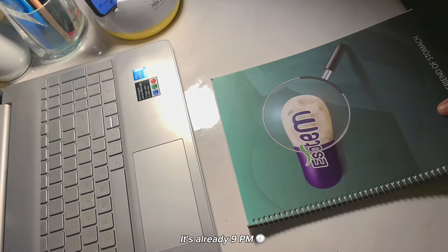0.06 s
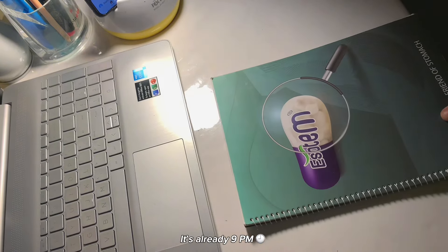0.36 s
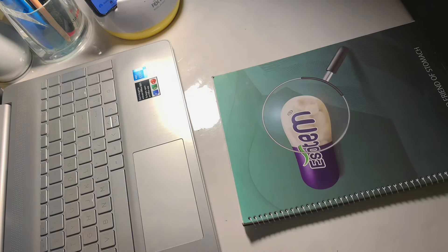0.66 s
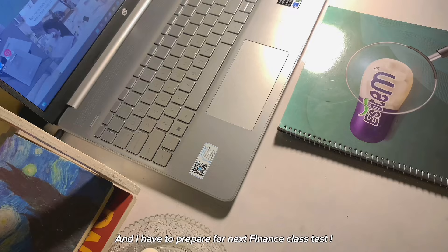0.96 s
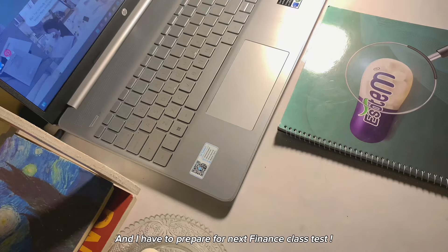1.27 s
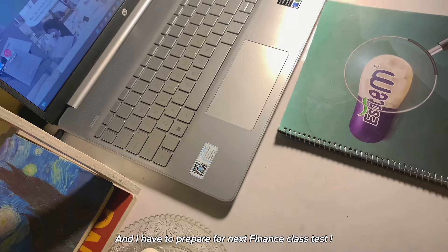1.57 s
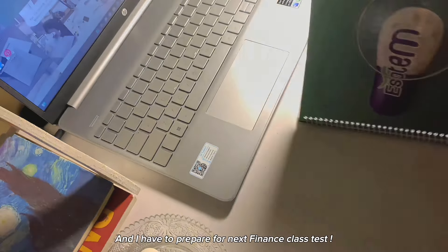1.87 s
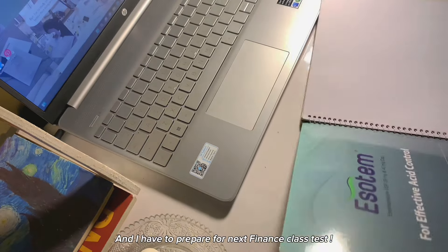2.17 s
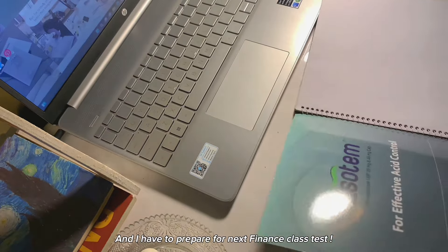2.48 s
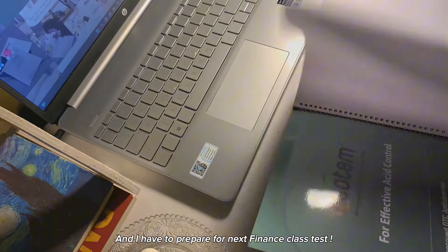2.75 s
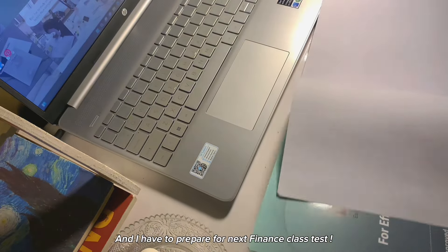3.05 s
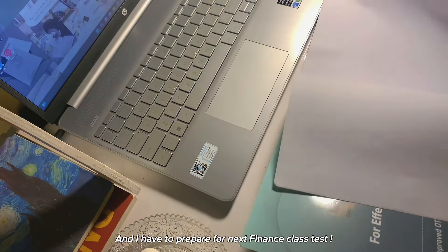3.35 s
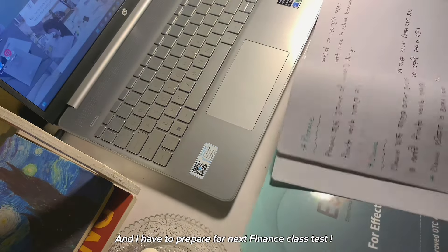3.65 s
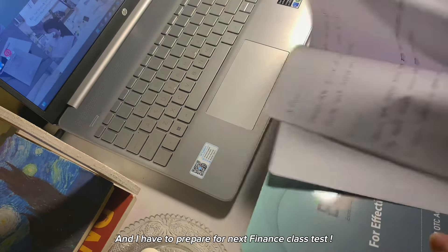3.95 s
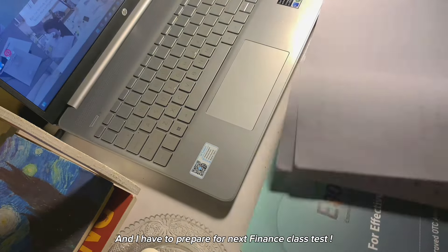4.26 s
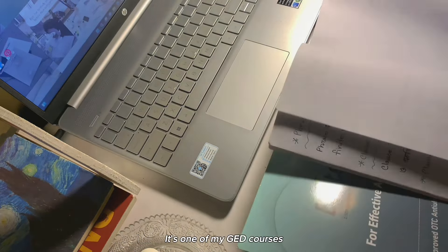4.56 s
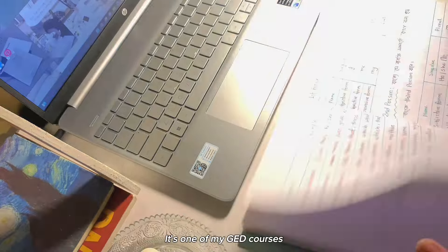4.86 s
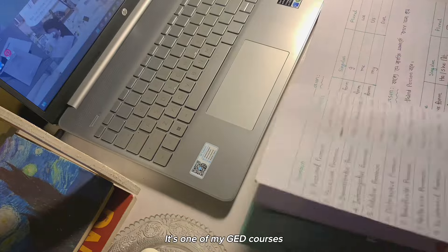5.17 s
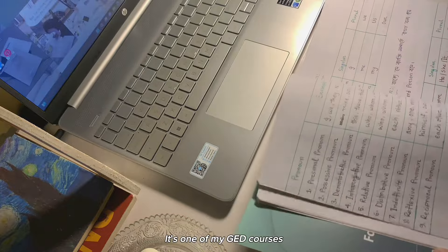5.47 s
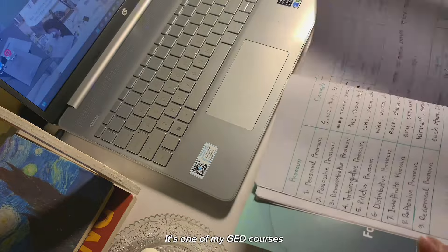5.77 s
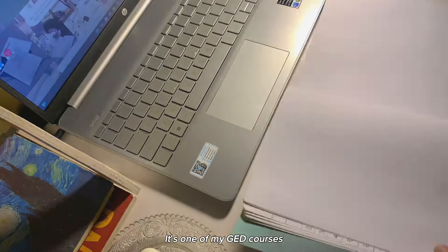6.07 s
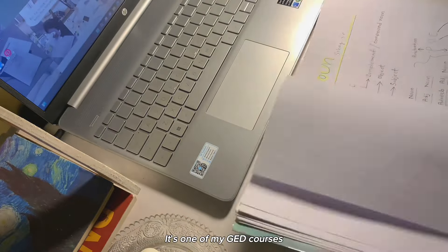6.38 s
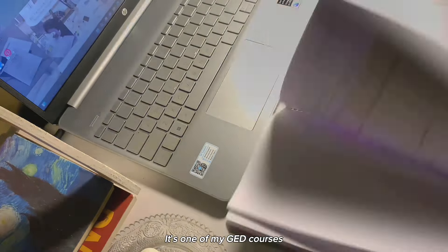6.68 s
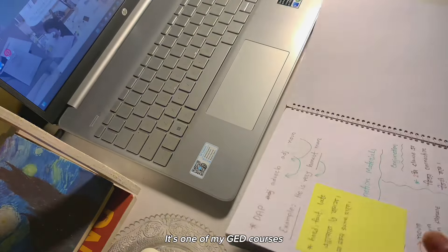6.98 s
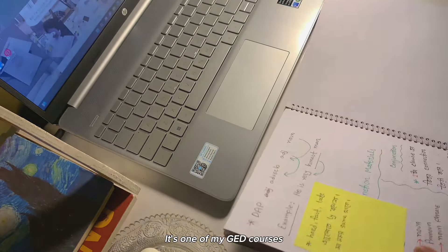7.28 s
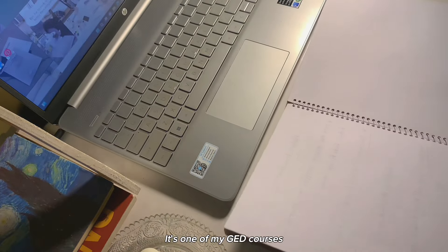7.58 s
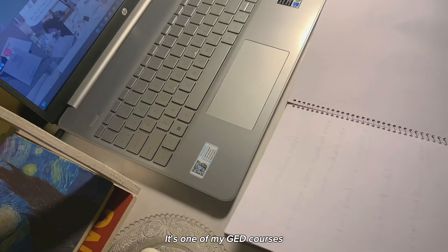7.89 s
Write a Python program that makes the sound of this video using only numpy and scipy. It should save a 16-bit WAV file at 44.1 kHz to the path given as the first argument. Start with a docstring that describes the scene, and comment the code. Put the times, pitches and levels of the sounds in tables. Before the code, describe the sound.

Pages of a spiral notebook are turned one after another, with papery hisses and crisp snaps in a quiet room.

```python
"""Turning notebook pages.

A spiral notebook is opened on a desk and its pages are turned one by one, close to the microphone.
Each sheet hisses as it slides off the next, crackles and snaps as it bends, then flops down
with a puff of air. Fingers brush the paper, the cover knocks on the desk,
and a small quiet room rumbles behind."""
import sys
import numpy as np
from scipy import signal
from scipy.fft import rfft, irfft
from scipy.io import wavfile
from scipy.ndimage import uniform_filter1d, map_coordinates

SR = 44100
rng = np.random.default_rng(int(sys.argv[2]) if len(sys.argv) > 2 else 0)


def unload_audio(sound):
    """Save the sound as a 16-bit wav file, at the path given as the first command line argument."""
    columns = np.transpose(np.atleast_2d(sound))
    # keep every value between -1 and 1, then stretch to whole-number steps
    steps = np.round(np.clip(columns, -1, 1) * 32767)
    wavfile.write(sys.argv[1], SR, steps.astype(np.int16))


N = 349713
TIME_S = np.arange(N) / SR
CONTROL_S = np.arange(0, N / SR + .01, .002)

# background spectrum: freq_hz, gain_db
ROOM_TONE = [(15, -25), (50, -4), (85, -1.5), (125, -1), (160, -9), (200, -4.5), (250, -11.5), (600, -17.5),
             (1000, -22.5), (1800, -37), (4200, -46), (5200, -42.5), (6600, -48.5), (11000, -44.5),
             (16000, -52.5)]
# rumble resonances: freq_hz, width_hz, gain_db
RUMBLE_PEAKS = [(87.6, 12, 5.5), (138, 18, 5), (194, 5, 8.5), (385, 39, 3.5)]
# room decay: freq_hz, t60_s
ROOM_DECAY = [(150, 0.79), (1000, 0.38), (4000, 0.33), (9000, 0.34), (16000, 0.18)]
# microphone port colour: freq_hz, width_hz, gain_db
MIC_PORT = [(5220, 530, 1.5), (6700, 900, 2.5), (10950, 600, 1.5), (11910, 1000, -6.5), (15200, 1200, -1)]
# modes of the notebook on the desk: freq_hz, gain_db, t60_s
DESK_MODES = [(60.6, -22, 0.25), (107, -2, 0.081), (135.6, -11.5, 0.51), (209, 3.5, .03),
              (315, -3.5, 0.064), (373, -2.5, 0.16), (420, -15, 0.15), (797, -8.5, 0.11), (942, -7, 0.11)]
# notebook bumping the desk: start_s, level_db, cutoff_hz
KNOCKS = [(1.696, -25, 75), (1.896, -31, 150), (1.909, -27.5, 1200), (1.993, -34, 130)]
# air pushed by a page or the cover: middle_s, length_s, level_db
PUFFS = [(1.903, .03, -37), (2.615, .03, -38), (2.645, .09, -44), (2.75, .12, -46), (3.3, .06, -40),
         (3.375, .06, -38), (3.885, .06, -42), (3.965, .12, -42), (4.59, .08, -43), (4.72, .06, -45),
         (4.88, .04, -44), (5.7, .025, -42), (5.768, .02, -33), (5.82, .08, -39), (6.415, .025, -43)]
# finger strokes: start_s, nominal_length_s, level_db, rasp_hz
BRUSHES = [(.15, .05, -69, 5160), (.552, .047, -73, 5000), (1.119, .095, -68, 2980),
           (1.206, .05, -58, 3180), (2.28, .13, -63, 3080), (3.015, .1, -67, 2880), (3.53, .14, -62, 4300),
           (5.262, .26, -61, 4000), (5.97, .056, -57, 4530), (6.12, .2, -64, 2900),
           (7.021, .026, -64, 5000), (7.175, .073, -65.5, 3070), (7.255, .03, -57, 4620),
           (7.394, .018, -66, 3980), (7.555, 0.22, -64, 4740)]
# skin-on-paper spectrum: freq_hz, gain_db
BRUSH_COLOUR = [(500, -14.5), (1300, -0.5), (2200, -7.5), (3300, -4), (5300, -4.5), (8000, -12.5),
                (10500, -10), (16000, -23.5)]
# resonant swells of a curved sheet: middle_s, length_s, level_db, centre_hz, width_hz
POCKETS = [(1.406, 0.062, -48, 1830, 1200), (1.475, .06, -49, 1750, 700), (1.54, .05, -44, 1700, 600),
           (1.901, .035, -30, 1050, 350), (1.94, .06, -40, 880, 260), (2.55, .12, -40, 4950, 250),
           (2.755, 0.07, -31, 1700, 500), (2.76, 0.054, -26.5, 2650, 800), (3.485, 0.05, -33.5, 720, 330),
           (3.67, .18, -62, 3780, 160), (3.99, 0.091, -32.5, 760, 260), (4.35, .08, -61, 2550, 200),
           (4.599, 0.038, -22.5, 3970, 900), (4.69, 0.13, -43, 740, 450), (5.165, 0.04, -42, 1300, 503),
           (5.73, .06, -46, 1350, 302), (5.816, 0.043, -39, 880, 450), (6.224, .04, -53, 1280, 800),
           (6.402, 0.014, -29, 650, 300), (6.543, 0.034, -29.5, 780, 420), (6.745, .045, -47, 1630, 500),
           (7.68, .2, -67, 3250, 400)]
# buckles, flicks, landings: time_s, level_db, centre_hz, decay_ms, relative_bandwidth
SNAPS = [(0.947, -58, 3000, 4, 2.5), (1.531, -39, 6000, 9, 2.5), (1.634, -45, 800, 3, 1),
         (1.877, -30, 2400, 1.8, .6), (1.9095, -25, 1300, 1.6, 2.5), (1.98, -29.5, 960, 0.79, 1.5),
         (2.213, -54, 1800, 3.5, 1.5), (2.276, -53, 3400, 2, .4), (2.607, -4.5, 4300, 1.8, 1.7),
         (2.664, -17, 5230, 4.6, 1.5), (2.757, -19, 2200, 2.9, .9), (2.952, -49.5, 3300, 1.9, .8),
         (3.261, -22.5, 3400, 1.4, 1.3), (3.294, -15.5, 4440, 4.8, 1.1), (3.304, -11, 2500, 2.8, .9),
         (3.313, -16, 6500, 1.2, 1.5), (3.3738, -9.5, 7500, 1.58, 1.3), (3.404, -22.5, 2000, 7.7, 1.2),
         (3.481, -26, 1260, 7, 1), (3.8644, -16, 5330, 1.93, 1.5), (4.0246, .5, 6400, 0.55, .5),
         (4.321, -51, 2490, 4, 1), (4.5705, -23.5, 1500, 3.5, 1.4), (4.608, -10.5, 4300, 1.5, 1),
         (4.867, -27, 4780, 3.1, 1.1), (4.891, -39, 3970, 1.6, 1.1), (4.96, -44, 5260, 4, 1.3),
         (5.019, -40, 6000, 3.6, 1.1), (5.032, -37, 6000, 2, 1.1), (5.072, -29, 1980, 2.5, .6),
         (5.0835, -18.5, 1880, 2.35, 1.4), (5.092, -26, 2500, 1.5, 1.8), (5.6966, -9.5, 1560, 1.8, .8),
         (5.7645, -18, 1020, .8, 1.5), (5.8017, -13, 7060, 1.9, 1.2), (5.812, -23.5, 1690, 13.8, 1.1),
         (6.324, -48, 1800, 8.5, 1.1), (6.382, -22, 2000, 2.5, 1.5), (6.3965, -12, 1970, 1.9, 1.6),
         (6.4063, -13, 2100, 1, 1.4), (6.567, -28.5, 2200, 4.1, 1.1), (6.778, -42, 2000, 2, .6),
         (6.7855, -32, 5700, 1.4, .8), (7.083, -50, 7000, 5, 1.5), (7.226, -55, 5500, 3, 1.5),
         (7.541, -53, 7000, 7, 1.3), (7.76, -49, 2900, 7, 1.2)]
# bends and flaps: peak_s, level_db, rise_20db_s, fall_20db_s, tilt_db_per_octave
BENDS = [(1.401, -45, 0.07, .3, 11), (1.55, -50, .14, .27, 1), (1.901, -31, 0.034, .05, 0),
         (1.987, -42, .012, .04, -14.5), (2.644, -31.5, .12, 0.1131, 1.5), (2.772, -26.5, .06, .04, -2),
         (2.82, -50, 0.07, .13, -3), (3.299, -24.5, .03, 0.04, 14), (3.405, -25.5, .08, .12, -1),
         (3.871, -33, 0, .14, -6.5), (3.987, -23.5, 0.0745, .1, -.5), (4.506, -45.5, 0.18, 0.23, -1.5),
         (4.59, -32, 0.0372, .13, 2), (4.716, -35.5, 0.14, .06, -3), (4.813, -46.5, 0.1, 0.18, 0),
         (4.88, -43, 0.03, .05, -7), (5.084, -35.5, 0.02, .11, -3), (5.7, -38, .2, .07, 0.5),
         (5.81, -25.5, 0.0325, .08, -4), (6.33, -46, .012, .08, -9), (6.399, -33, 0.0374, .08, -1),
         (6.549, -32, 0.1, 0.1035, -3), (6.79, -51, .08, .11, 4), (7.85, -46, 0.07, 0, 15)]
# bending spectrum: freq_hz, gain_db
BEND_COLOUR = [(80, -18.5), (200, -7), (290, -13), (400, -5), (540, -7), (750, -1.5), (1100, -2.5),
               (1600, -0.5), (2600, -4.5), (3800, -7.5), (6000, -24), (14000, -38)]
# sheet sliding on sheet: start_s, length_s, level_db, rise_s, fall_20db_s, tilt_db_per_octave
SLIDES = [(1.33, 0.086, -44.5, .06, .26, -6), (1.526, 0.018, -44, .008, .15, 2),
          (1.686, 0.062, -55, 0.037, .08, -2.5), (1.875, 0.036, -35, .025, 0.035, -9.5),
          (1.972, .014, -48, 0.0056, .045, -3), (2.44, .09, -33, .024, .1, 6), (2.5, .14, -33, .05, .08, 2),
          (2.655, .1, -27.5, .07, 0.0341, 1.5), (3.088, .04, -47, .025, .15, -6),
          (3.1, .16, -37.5, .09, .08, 7), (3.271, .04, -18.5, 0.032, .03, 1.5),
          (3.327, 0.053, -32, .02, .08, -0.5), (3.718, .12, -32, .045, .2, 4.5),
          (3.927, 0.058, -24.5, 0.05, .095, 0.5), (4.357, .22, -38.5, 0.063, .1, 1),
          (4.565, .045, -29.5, 0.033, .05, -4), (4.628, .08, -36.5, 0.044, 0.08, 3.5),
          (4.756, .09, -39.5, 0.031, .09, -0.5), (4.953, 0.015, -43, .008, 0.11, 0.5),
          (5.009, 0.022, -38, 0.016, .025, -0.5), (5.074, 0.014, -33, .01, .028, -2),
          (5.258, .05, -61, .02, .3, -4), (5.46, .04, -56, .02, .1, 2), (5.5, .15, -38.5, .09, .09, 3.5),
          (5.742, .08, -37.5, .012, .05, 0), (5.992, .05, -57, .014, .04, 2),
          (6.341, .15, -32, 0.06, .16, 5), (6.56, 0.052, -37.5, 0.011, .06, 5),
          (6.678, .065, -45, 0.023, .055, 3), (7.59, .16, -67, .04, .05, 6),
          (7.803, .13, -32.5, 0.073, .1, 1.5)]
# sliding spectrum: freq_hz, gain_db
SLIDE_COLOUR = [(200, -33.5), (700, -14), (1800, -6), (3200, -0.5), (5000, 3), (7000, 0), (9000, 1),
                (11000, -1.5), (12500, -3.7), (16000, -9)]


def amp(db):
    """Decibels to gain."""
    return 10 ** (np.asarray(db) / 20)


def unit_rms(x):
    """Scale to rms 1."""
    return x / np.sqrt(np.mean(x ** 2) + 1e-20)


def lookup(table, hz):
    """Interpolate over log frequency."""
    freq_hz, value = np.transpose(table)
    return np.interp(np.log(hz + 1), np.log(freq_hz + 1), value)


def peaks_db(resonances, hz):
    """Summed resonance curves."""
    return sum(db / (1 + (2 * (hz - freq_hz) / width_hz) ** 2) for freq_hz, width_hz, db in resonances)


def add(mix, start_s, sound):
    """Mix a sound in at start_s."""
    part = mix[max(round(start_s * SR), 0):][:len(sound)]
    part += sound[:len(part)]


def filtered(x, gain, size):
    """Time-varying filter: gain(hz column, seconds row)."""
    frames = dict(fs=SR, nperseg=size, noverlap=size * 3 // 4)
    hz, t, spectra = signal.stft(x, **frames)
    return signal.istft(spectra * gain(hz[:, None], t), **frames)[1][:len(x)]


def wander(rate_hz):
    """Smooth random drift, rms 1."""
    hz = np.fft.rfftfreq(N, 1 / SR)
    return unit_rms(irfft(rfft(rng.standard_normal(N)) / (1 + (hz / rate_hz) ** 4), N))


def background(level_db=-50.5):
    """Steady room rumble with soft resonances and faint hiss."""
    def colour(hz, t):
        return amp(lookup(ROOM_TONE, hz) + peaks_db(RUMBLE_PEAKS, hz))
    return amp(level_db) * unit_rms(filtered(rng.standard_normal(N), colour, size=4096))


def room_echo(x, wet_db=-21, gap_s=.0054, dull_hz=8000, echoes_per_s=3000):
    """Sparse wall echoes; treble dies first."""
    def decay(hz, t):
        return 1000 ** (-t / lookup(ROOM_DECAY, hz)) / np.hypot(1, hz / dull_hz)
    taps = rng.standard_normal(SR // 2) * (rng.random(SR // 2) < echoes_per_s / SR)
    taps *= np.arange(len(taps)) > gap_s * SR
    tail = filtered(taps, decay, size=256)
    return amp(wet_db) * signal.fftconvolve(x, tail / np.linalg.norm(tail))[:N]


def desk_knocks():
    """Bumps ring the notebook and desk modes; soft ones only the lowest."""
    out, t = np.zeros(N), np.arange(SR // 2) / SR
    for start_s, level_db, cutoff_hz in KNOCKS:
        for hz, gain_db, t60_s in DESK_MODES:
            gain = amp(level_db + gain_db) / np.hypot(1, (hz / cutoff_hz) ** 2)
            add(out, start_s, gain * 1000 ** (-t / t60_s) * np.sin(2 * np.pi * hz * t))
    return out


def air_puffs(low_hz=62, high_hz=210):
    """A swinging page pushes a soft gust past the microphone."""
    out, hz = np.zeros(N), np.fft.rfftfreq(SR // 2, 1 / SR) + 1
    band = 1 / np.hypot(1, (low_hz / hz) ** 2) / np.hypot(1, (hz / high_hz) ** 2)
    for middle_s, length_s, level_db in PUFFS:
        swell = np.hanning(round(length_s * SR))
        gust = irfft(rfft(rng.standard_normal(SR // 2)) * band)[:len(swell)]
        puff = unit_rms(gust * swell) * np.sqrt(np.mean(swell ** 2))
        add(out, middle_s - length_s / 2, amp(level_db) * puff)
    return out


def fibres(clicks_per_s, spread_db, click_share):
    """Fibres catch and let go: uneven clicks over a blur of tiny ones."""
    sizes = amp(spread_db * np.minimum(rng.exponential(1, N), 4))
    clicks = sizes * rng.choice([-1, 1], N) * (rng.random(N) < clicks_per_s / SR)
    return np.sqrt(click_share) * unit_rms(clicks) + np.sqrt(1 - click_share) * rng.standard_normal(N)


def ripples(hz, t, drift=.04, drift_hz=3):
    """A sheet's many small resonances glide together as it changes shape."""
    field = uniform_filter1d(rng.standard_normal((len(hz), len(t))), size=3, axis=0)
    field = uniform_filter1d(field, size=40, axis=1)
    stretch = np.exp(drift * np.interp(t, TIME_S, wander(drift_hz)))
    row, column = np.indices(field.shape)
    gliding = map_coordinates(field, [row * stretch, column], order=1, mode="mirror")
    return 2 * np.tanh(unit_rms(gliding) / 2)


def finger_brushes(rasp_db=7, rasp_width_hz=750, glide_octaves_per_s=.8, pivot_hz=4700, ripple_db=3):
    """Skin drags over the page in soft strokes, each with a rising rasp."""
    out = np.zeros(N)
    drive = fibres(clicks_per_s=1100, spread_db=3, click_share=.4) * amp(1.66 * wander(rate_hz=44))
    drive = filtered(drive, lambda hz, t: amp(ripple_db * ripples(hz, t)), size=512)
    for start_s, length_s, level_db, rasp_hz in BRUSHES:
        stroke = signal.windows.tukey(round(1.31 * length_s * SR), .5)
        db_per_octave = 4 * np.log2(rasp_hz / pivot_hz)  # a lower rasp is duller

        def colour(hz, t):
            tilt_db = db_per_octave * np.log2(np.maximum(hz, 1000) / pivot_hz)
            pitch_hz = rasp_hz * 2 ** (glide_octaves_per_s * (t - length_s / 2))
            peak_db = peaks_db([(pitch_hz, rasp_width_hz, rasp_db)], hz)
            return amp(lookup(BRUSH_COLOUR, hz) + tilt_db + peak_db)
        rub = filtered(drive[round(start_s * SR):][:SR // 2], colour, size=512)[:len(stroke)]
        add(out, start_s - length_s / 8, amp(level_db) * unit_rms(rub) * stroke[:len(rub)])
    return out


def air_pockets(glide_octaves_per_s=-.6):
    """Rustle swells in a resonance of the curved sheet and the air under it, sinking as it relaxes."""
    out, hz = np.zeros(N), np.fft.fftfreq(SR // 2, 1 / SR)
    for middle_s, length_s, level_db, centre_hz, width_hz in POCKETS:
        swell = np.hanning(round(length_s * SR))
        band = np.exp(-2 * (hz / width_hz) ** 2)
        flutter = np.fft.ifft(np.fft.fft(rng.standard_normal(SR // 2)) * band)[:len(swell)]
        pitch_hz = centre_hz * 2 ** (glide_octaves_per_s * (TIME_S[:len(swell)] - length_s / 2))
        hollow = (flutter * np.exp(2j * np.pi * np.cumsum(pitch_hz) / SR)).real
        rustle = unit_rms(hollow * swell) * np.sqrt(np.mean(swell ** 2))
        add(out, middle_s - length_s / 2, amp(level_db) * rustle)
    return out


def slide_motion(speed_power=1.3, dulling_per_octave=.15):
    """Level and tilt of each slide: it speeds up, holds and dies away, duller while slow."""
    start_s, length_s, level_db, rise_s, fall_s, tilt = np.transpose(SLIDES)[:, :, None]
    age_s = CONTROL_S - start_s
    speed = np.clip(age_s / rise_s, 1e-6, 1)
    shape_db = 20 * (speed_power * np.log10(speed) - np.maximum(age_s - length_s, 0) / fall_s)
    return level_db + shape_db, tilt + dulling_per_octave * shape_db


def bend_motion():
    """Level and tilt of each bend: it builds and relaxes; a tauter one is brighter."""
    peak_s, level_db, rise_s, fall_s, tilt = np.transpose(BENDS)[:, :, None]
    shape_db = -20 * np.maximum((peak_s - CONTROL_S) / rise_s, (CONTROL_S - peak_s) / fall_s)
    return level_db + shape_db, tilt


def sheet(drive, motions, colour, pivot_hz, reach_octaves, ripple_db):
    """A moving sheet radiates the drive. Motions add in power; the loudest sets the tilt."""
    power = sum((amp(db) ** 2).sum(0) for db, _ in motions) + 1e-14
    db_per_octave = sum((amp(db) ** 2 * tilt).sum(0) for db, tilt in motions) / power
    level_db = np.interp(TIME_S, CONTROL_S, 10 * np.log10(power))

    def response(hz, t):
        octaves = np.clip(np.log2((hz + 1) / pivot_hz), -reach_octaves, reach_octaves)
        tilt_db = np.interp(t, CONTROL_S, db_per_octave) * octaves
        gain = amp(lookup(colour, hz) + tilt_db + ripple_db * ripples(hz, t))
        return gain / np.sqrt(np.mean(gain ** 2, 0))
    return filtered(drive, response, size=512) * amp(level_db)


def sliding_hiss(trim_db=-.38):
    """Fine sheet-on-sheet friction, wavering with hand pressure."""
    pressure = amp(1.4 * wander(rate_hz=80))
    drive = fibres(clicks_per_s=2500, spread_db=2, click_share=.4) * pressure
    hiss = sheet(drive, [slide_motion()], SLIDE_COLOUR, pivot_hz=8000, reach_octaves=.83, ripple_db=3.2)
    return amp(trim_db) * hiss


def bending_crackle(trim_db=.38, drag_db=-22, drag_db_per_octave=4):
    """Coarse crackle in clumps as the sheet is dragged, curls over and flutters down."""
    clicks = fibres(clicks_per_s=1500, spread_db=1.5, click_share=.35)
    clumps = amp(3.6 * np.tanh(wander(rate_hz=77)))
    drive = unit_rms(clicks * clumps)
    slide_db, _ = slide_motion()
    drag = (slide_db + drag_db, drag_db_per_octave)  # a sliding sheet also bends a little
    crackle = sheet(drive, [bend_motion(), drag], BEND_COLOUR, pivot_hz=1320, reach_octaves=.5,
                    ripple_db=3.5)
    return amp(trim_db) * crackle


def buckle_snaps(rise_ratio=.36, kick=1.8, body_gain=.07, body_hz=900, lag_s=.0012, lead_s=.01):
    """A buckle crosses the sheet in milliseconds; a taut sheet cracks high, a slack one plops low."""
    out = np.zeros(N)
    t_ms = (np.arange(4096) / SR - lead_s) * 1000
    hz = np.fft.rfftfreq(len(t_ms), 1 / SR) + 1
    for time_s, level_db, centre_hz, decay_ms, bandwidth in SNAPS:
        age = t_ms / decay_ms - .5  # zero at the burst's peak
        burst = rng.standard_normal(len(t_ms)) * np.exp(-np.maximum(age, -age / rise_ratio))
        burst[np.searchsorted(age, 0)] += kick  # the fold pops through
        fold = 1 / (1 + 1j * (hz / centre_hz - centre_hz / hz) / bandwidth)
        fold /= 1 + .3 * centre_hz / (1j * hz)  # bass cut
        body = body_gain * bandwidth / (1 + 1j * (hz / body_hz - body_hz / hz))
        delay_s = lag_s * (np.sqrt(1000 / hz) - np.sqrt(1000 / centre_hz))  # low bending waves lag
        dispersion = np.exp(-2j * np.pi * np.cumsum(delay_s) * SR / len(t_ms))
        low_pass = 1 / (1 + 1j * hz / (1.2 * centre_hz))
        crack = irfft(rfft(burst) * (fold + body) * dispersion * low_pass)
        duty = decay_ms / 2 / np.ptp(t_ms)
        add(out, time_s - lead_s, amp(level_db) * unit_rms(crack) * np.sqrt(duty))
    return out


def scene():
    """Paper, desk and air with their room echo, over the background."""
    paper = sliding_hiss() + bending_crackle() + buckle_snaps() + air_pockets() + finger_brushes()
    high_pass = signal.butter(N=2, Wn=110, btype="high", fs=SR, output="sos")
    near = signal.sosfilt(high_pass, paper) + desk_knocks() + air_puffs()
    return (near + room_echo(near) + background())[None]


def record(dry):
    """Microphone colour, clipping at full scale, band limit."""
    heard = filtered(dry[0], lambda hz, t: amp(peaks_db(MIC_PORT, hz)), size=512)
    low_pass = signal.firwin(511, cutoff=16200, window=("kaiser", 9), fs=SR)
    return signal.oaconvolve(np.clip(heard, -1, 1), low_pass, "same")[None]


dry = scene()
out = record(dry)
unload_audio(out)
```